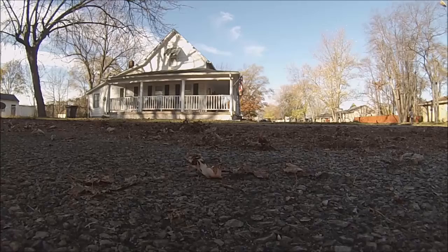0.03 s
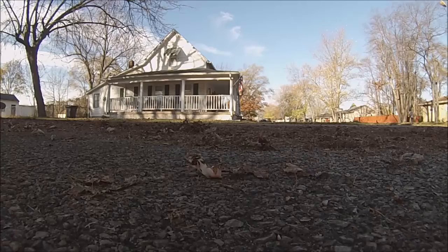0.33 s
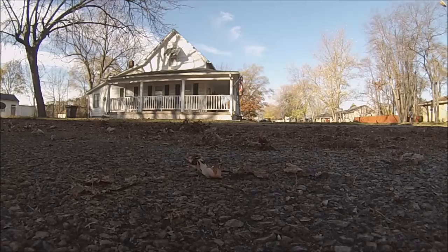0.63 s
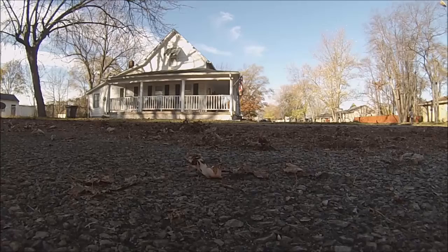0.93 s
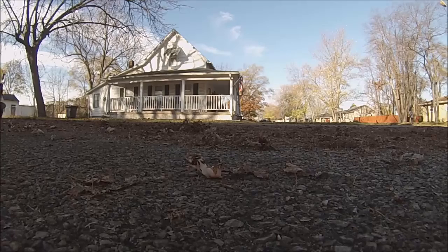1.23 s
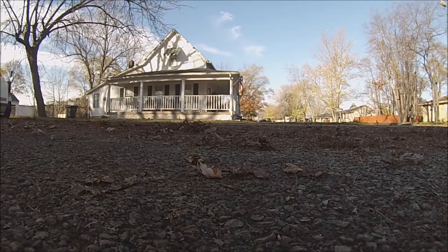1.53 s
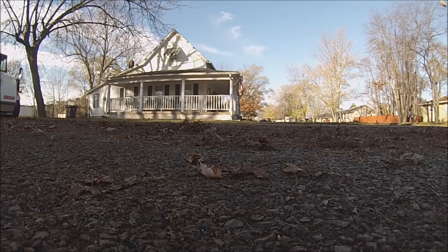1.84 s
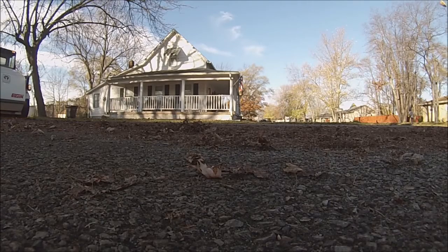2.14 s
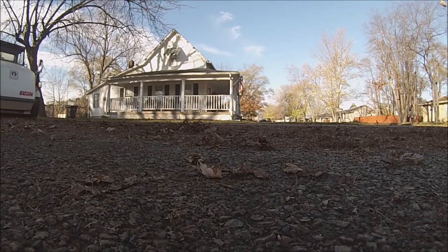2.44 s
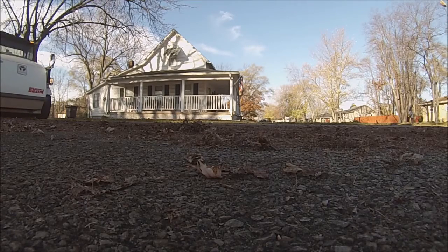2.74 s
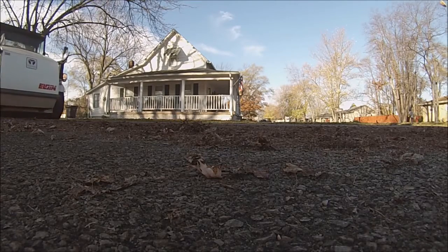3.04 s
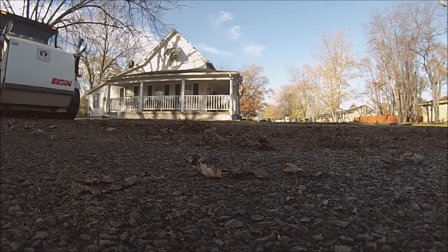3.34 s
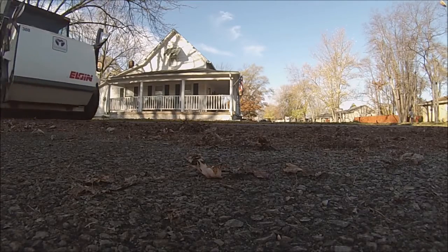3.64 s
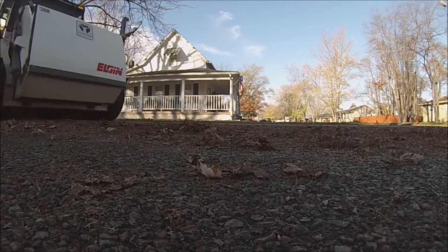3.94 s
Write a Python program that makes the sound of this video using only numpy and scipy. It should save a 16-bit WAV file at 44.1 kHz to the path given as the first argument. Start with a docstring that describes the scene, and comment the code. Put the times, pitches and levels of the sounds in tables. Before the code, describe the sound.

A street sweeper creeps up a paved road toward a microphone at ground level. Its diesel engine drones steadily under a wavering hydraulic whine, while the fan roar and the hiss of steel brooms grow gradually louder.

```python
"""Street sweeper approaching

A street sweeper creeps up an asphalt road towards a listener at ground level. Its diesel drones
at a governed speed, a hydraulic pump whines and sags under load, fan and body roar, and the steel
brooms hiss over grit. The sound cuts in abruptly, and now and then the treble dips briefly."""
import sys
import numpy as np
from scipy import signal
from scipy.fft import rfft, irfft
from scipy.io import wavfile
from scipy.ndimage import uniform_filter1d

SR = 44100
rng = np.random.default_rng(int(sys.argv[2]) if len(sys.argv) > 2 else 0)


def digitize_waveform(pressure):
    """Quantize a signal to 16-bit integers and store it at the path in sys.argv[1].

    Rows of a 2-D input are taken as channels; values are limited to [-1, 1].
    """
    field = np.atleast_2d(pressure).T
    bounded = np.clip(field, -1, 1)
    quanta = np.round(bounded * 32767).astype(np.int16)
    wavfile.write(sys.argv[1], SR, quanta)


N = 176400

# diesel firing rate (time [s], rate [Hz])
FIRING_RATE = [(.15, 80.2), (1.9, 80.2), (2.6, 80.4), (3.1, 80.6), (4, 80.8)]
# fader rides for the firing throb and the exhaust drone, before trim (time [s], level [dB])
THROB_RIDE = [(0.16, -39), (0.19, -48), (0.77, -27), (0.85, -45), (1.49, -25.5), (1.82, -31), (1.87, -52),
              (1.92, -34), (2.59, -27.5), (2.76, -53), (2.8, -35), (3.37, -33), (3.46, -27), (4.0, -32)]
DRONE_RIDE = [(.16, -23.5), (.45, -23.5), (.62, -17.5), (.77, -17), (.95, -18.5), (1.15, -35.5),
              (1.45, -42.5), (1.72, -35), (1.88, -22.5), (2.15, -18), (2.47, -14.5), (2.68, -17.5),
              (2.82, -16), (2.95, -19.5), (3.07, -36), (3.25, -25), (3.42, -22.5), (3.56, -15), (3.7, -14),
              (3.8, -20), (3.9, -17), (4, -19.5)]
# crankshaft overtones (multiple of the shaft rate, relative level [dB])
SHAFT_OVERTONES = [(7, -30.5), (9, -34), (10, -36.5), (15, -35.5), (17, -34.5), (18, -31.5), (27, -47)]
# one ride for all those overtones (time [s], gain [dB])
SHAFT_RIDE = [(.14, -11), (1.2, -15), (2.1, -0.5), (2.45, -1), (2.65, 2.5), (2.85, -0.5), (3.1, -0.5),
              (3.35, 0.5), (3.55, 0.5), (4, -4.5)]

# pitch of the hydraulic whine (time [s], pitch [Hz])
PUMP_PITCH = [(.15, 428.6), (.32, 427.6), (.55, 423), (.7, 415), (.82, 414), (1.0, 421.5), (1.15, 425),
              (1.38, 426.7), (1.5, 421.8), (1.6, 418), (1.78, 413.5), (2.1, 425), (2.48, 427.7),
              (2.7, 420.2), (3.2, 428), (3.36, 409.2), (3.5, 397.3), (3.68, 403.1), (3.85, 415), (4, 415)]
# rides for pump harmonics 1 to 4, the first two before trim (time [s], level [dB])
PUMP_RIDE_1 = [(.16, -27), (.55, -29), (.85, -33.5), (1.0, -21), (1.36, -19.5), (1.52, -34), (1.7, -36),
               (1.79, -16), (1.87, -43), (2.05, -35), (2.2, -21.5), (2.48, -19), (2.66, -25.5),
               (2.79, -21.5), (2.97, -20.5), (3.2, -24), (3.42, -30.5), (3.7, -25.5), (4, -20.5)]
PUMP_RIDE_2 = [(.16, -28.5), (.5, -35), (.72, -23.5), (.88, -29.5), (1.0, -25.5), (1.22, -32.5),
               (1.45, -20), (1.54, -31), (1.62, -18.5), (1.85, -36), (2.1, -32), (2.25, -23), (2.48, -18),
               (2.64, -34), (2.77, -22), (2.96, -38.5), (3.35, -23.5), (3.6, -26), (3.76, -23), (4, -26)]
PUMP_RIDE_3 = [(.16, -44.5), (1.25, -44.5), (1.55, -33), (1.75, -37.5), (1.95, -50), (2.5, -38.5),
               (3.0, -57), (3.55, -34), (4, -46)]
PUMP_RIDE_4 = [(.16, -64), (1.8, -55), (2.25, -40.5), (2.85, -51), (3.15, -35), (3.35, -48.5), (4, -46)]

# tone colour of the fan and body roar (frequency [Hz], relative level [dB])
ROAR_EQ = [(20, -23), (32, -17), (43, -3.5), (60, -6.5), (100, -6), (135, -2), (180, 0), (235, -2.5),
           (295, 3.5), (335, 0), (370, 1), (450, -1), (540, -4.5), (700, -3.5), (920, -4), (1100, -8.5),
           (1270, -11), (1480, -16.5), (1800, -15.5), (2100, -23), (2600, -31), (4000, -30), (8000, -72)]
# rides for the roar's three bands, mids and upper mids before trim (time [s], level [dB])
BASS_RIDE = [(0.16, -31), (0.29, -26), (1.03, -28.5), (1.08, -23.5), (1.71, -26.5), (1.97, -23),
             (2.63, -24.5), (2.77, -20), (3.47, -25.5), (3.56, -19), (3.69, -23.5), (4.0, -16.5)]
MIDS_RIDE = [(0.16, -33), (2.67, -23), (2.77, -24.5), (3.03, -24), (3.06, -28.5), (3.57, -21), (3.58, -26),
             (4.0, -23)]
UPPER_MIDS_RIDE = [(.16, -31.5), (.6, -31), (1.1, -28.5), (1.5, -26), (2.0, -25), (2.55, -24.5),
                   (2.85, -24), (3.3, -24), (3.6, -25.5), (4, -21.5)]

# tone colours of the broom scrape and the steel bristles' ring (frequency [Hz], relative level [dB])
SCRAPE_EQ = [(800, -29), (1800, 1.5), (2600, -5), (3200, -4.5), (3550, -5.5), (4100, -1), (4600, -0.5),
             (5050, -4.5), (5400, -4), (5850, -6.5), (7000, -5.5), (8400, -6.5), (9200, -10), (10600, -9),
             (13300, -15.5), (14200, -19), (15100, -18)]
RING_EQ = [(2500, -50), (3700, -19), (4200, -5), (4600, -3.5), (4800, 1), (5000, -3), (5600, -15),
           (7000, -50)]
# ride for scrape and ring together, before trim (time [s], level [dB])
BROOM_RIDE = [(.16, -41), (.9, -40), (1.6, -41.5), (2.3, -39), (3.0, -36), (3.6, -34.5), (4, -31.5)]

# brief dips of the treble (time [s], hold at the bottom [s], gain [dB])
TREBLE_DIPS = [(.499, .001, -22), (.638, 0.022, -23), (.968, 0.00098, -25), (1.076, .001, -12),
               (1.119, .001, -13), (1.310, .002, -10), (1.459, .002, -14), (2.452, .022, -23),
               (2.782, 0.0027, -14), (3.102, .002, -9), (3.594, .001, -21), (3.891, 0.00099, -21)]


def diesel(throb_trim_db=-1, drone_trim_db=-1.5):
    """Two firings a turn: a throb, the exhaust drone an octave up, and rougher shaft overtones."""
    shaft = turn(curve(FIRING_RATE) / 2)
    firing = 2 * shaft
    throb = tone(firing, scatter=0.21, flutter_hz=22) * undb(curve(THROB_RIDE) + throb_trim_db)
    drone = tone(2 * firing, scatter=0.037, flutter_hz=28) * undb(curve(DRONE_RIDE) + drone_trim_db)
    overtones = sum(undb(db) * tone(round(multiple) * shaft, scatter=0.28, flutter_hz=14)
                    for multiple, db in SHAFT_OVERTONES)
    return throb + drone + overtones * undb(curve(SHAFT_RIDE))


def hydraulic_pump(first_trim_db=-2, second_trim_db=-0.5):
    """A whine that sags under load; its four harmonics swell and fade as the machine moves."""
    phase = turn(curve(PUMP_PITCH) * (1 + 0.001 * wander(20)))
    rides = [curve(PUMP_RIDE_1) + first_trim_db, curve(PUMP_RIDE_2) + second_trim_db,
             curve(PUMP_RIDE_3), curve(PUMP_RIDE_4)]
    return sum(undb(db) * tone(harmonic * phase, scatter=0.2, flutter_hz=30)
               for harmonic, db in enumerate(rides, 1))


def body_roar(rumble_db=-33, mids_trim_db=-2, upper_trim_db=-1.5):
    """Fan and body noise: a steady rumble under three bands that swell and flutter on their own."""
    noise = colour(rng.standard_normal(N), ROAR_EQ)
    rumble, rest = split(noise, hz=124)
    bass, rest = split(rest, hz=401)
    mids, upper = split(rest, hz=750)
    bass = unit(bass) * undb(curve(BASS_RIDE) + 0.68 * wander(25.02))
    mids = unit(mids) * undb(curve(MIDS_RIDE) + mids_trim_db + 0.4 * wander(25.32))
    upper = unit(upper) * undb(curve(UPPER_MIDS_RIDE) + upper_trim_db + 0.64 * wander(29.95))
    return unit(rumble) * undb(rumble_db) + bass + mids + upper


def brooms(grit_per_s=2800, grit_mix_db=-12.5, air_db_per_s=0.8, ring_db_per_s=2, trim_db=-0.35):
    """Steel bristles scrape the asphalt, flick grit and ring; the hiss brightens as they near."""
    t = np.arange(N) / SR
    grit = (rng.random(N) < grit_per_s / SR) * rng.standard_normal(N)
    grit *= undb(1.5 * np.minimum(rng.exponential(size=N), 5))  # a few grains hit harder
    scrape = colour(rng.standard_normal(N) + undb(grit_mix_db) * unit(grit), SCRAPE_EQ)
    hiss, air = split(scrape, hz=9100)
    hiss *= undb(0.67 * wander(39.95))
    air *= undb(air_db_per_s * (t - 6) + 0.25 * wander(40))
    ring = colour(rng.standard_normal(N), RING_EQ)
    ring *= undb(-6 + ring_db_per_s * (t - 3.5) + 1.2 * wander(24.53))
    return (hiss + air + ring) * undb(curve(BROOM_RIDE) + trim_db)


def tone(phase, scatter, flutter_hz):
    """A partial at rms 1, with a share that arrives scattered by shifting reflections."""
    paths = 1 + scatter * (wander(flutter_hz) + 1j * wander(flutter_hz))
    direct = np.exp(1j * (phase + 2 * np.pi * rng.random()))
    return unit(np.real(paths * direct))


def turn(hz):
    """Phase of something turning at hz, from a random start."""
    return 2 * np.pi * (np.cumsum(hz) / SR + rng.random())


def wander(hz):
    """Smooth random modulation with a spread near 1 and hz new values a second."""
    hold = int(SR / hz)
    steps = np.repeat(rng.standard_normal(N // hold + 1), hold)
    return 1.31 * uniform_filter1d(uniform_filter1d(steps, hold), hold)[:N]


def colour(x, eq):
    """Shape x with an EQ curve and scale it to rms 1."""
    hz, db = np.array(eq).T
    freqs = np.maximum(np.fft.rfftfreq(N, 1 / SR), 1)
    gain = undb(np.interp(np.log(freqs), np.log(hz), db))
    return unit(irfft(rfft(x) * gain, N))


def split(x, hz, order=4):
    """Crossover: the parts of x below and above hz."""
    freqs = np.fft.rfftfreq(N, 1 / SR)
    low = irfft(rfft(x) / (1 + (freqs / hz) ** (2 * order)), N)
    return low, x - low


def curve(rows):
    """Automation: straight ramps between (time, value) points."""
    return np.interp(np.arange(N) / SR, *np.array(rows).T)


def undb(db):
    """Decibels to gain."""
    return 10 ** (np.asarray(db) / 20)


def unit(x):
    """Scale to rms 1."""
    return x / np.sqrt(np.mean(x ** 2))


def scene():
    """The whole sweeper, in mono."""
    return (diesel() + hydraulic_pump() + body_roar() + brooms())[None]


def record(dry):
    """The treble dips briefly, the sound cuts in after silence, and a steep high cut trims the top."""
    dip_fade_s, start_s, high_cut_hz = 0.015, 0.139, 15350
    t = np.arange(N) / SR
    low, treble = split(dry, hz=1840, order=6)
    for at, hold, db in TREBLE_DIPS:
        recovery = np.clip((np.abs(t - at) - hold / 2) / dip_fade_s, 0, 1)
        treble *= undb(db) + (1 - undb(db)) * recovery
    gate = np.clip((t - start_s) / 0.001, 0, 1)
    high_cut = signal.ellip(10, 0.2, 80, high_cut_hz, fs=SR, output="sos")
    return signal.sosfilt(high_cut, (low + treble) * gate)


dry = scene()
out = record(dry)
digitize_waveform(out)
```